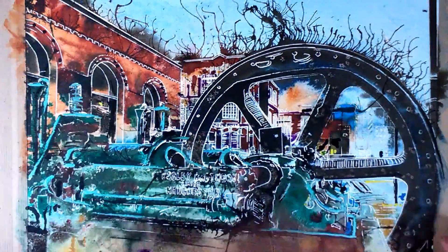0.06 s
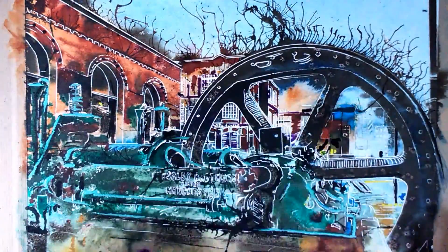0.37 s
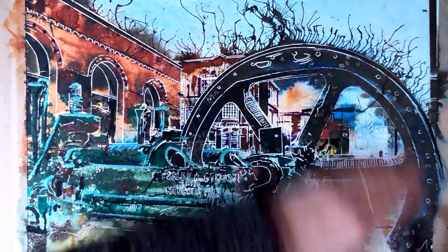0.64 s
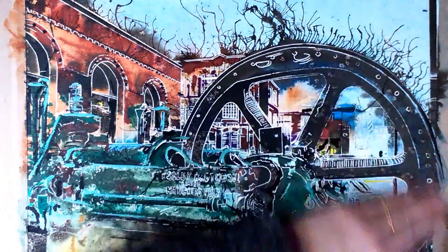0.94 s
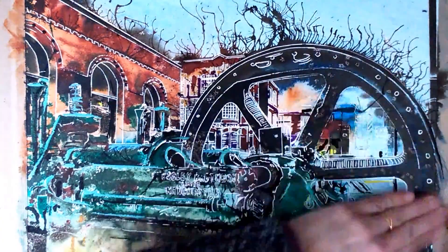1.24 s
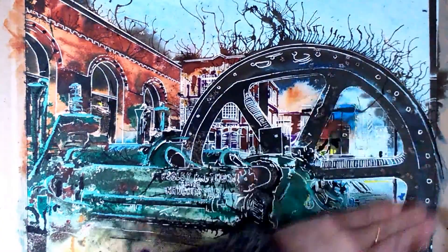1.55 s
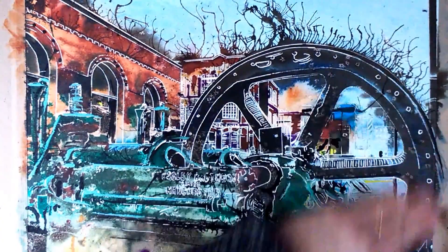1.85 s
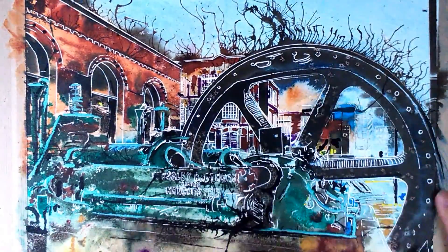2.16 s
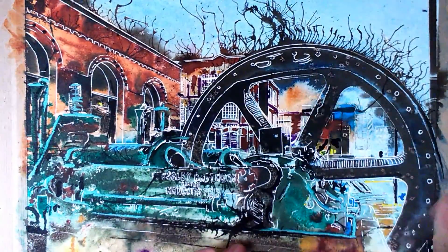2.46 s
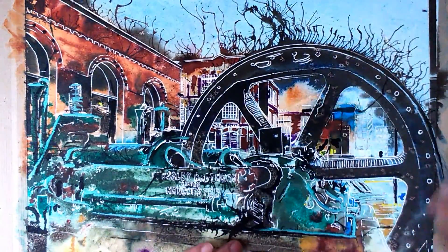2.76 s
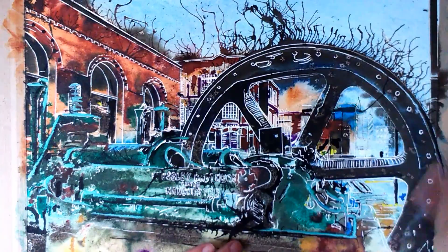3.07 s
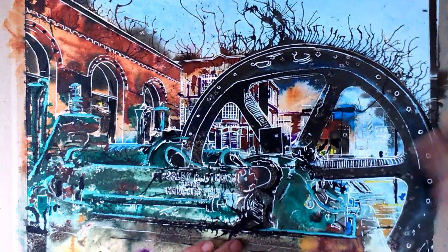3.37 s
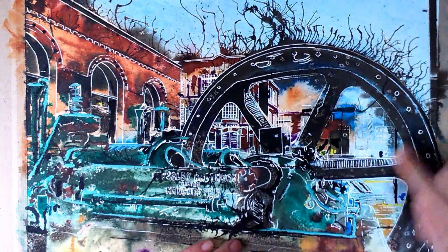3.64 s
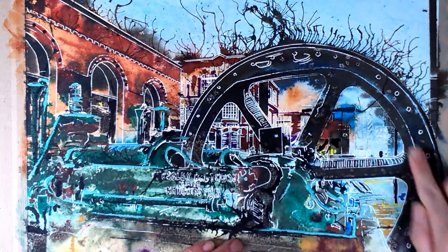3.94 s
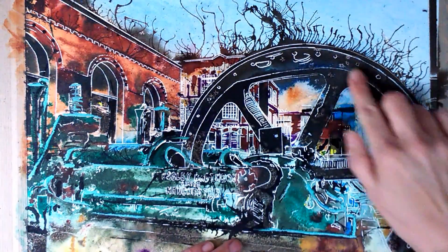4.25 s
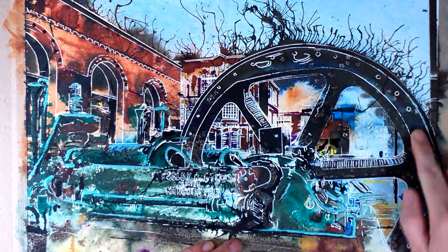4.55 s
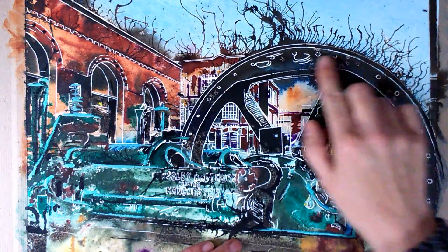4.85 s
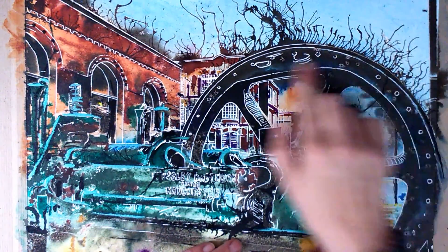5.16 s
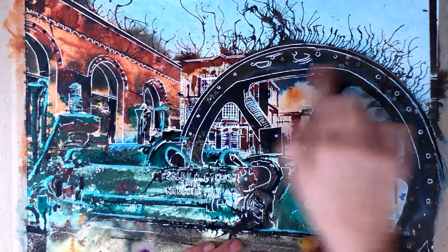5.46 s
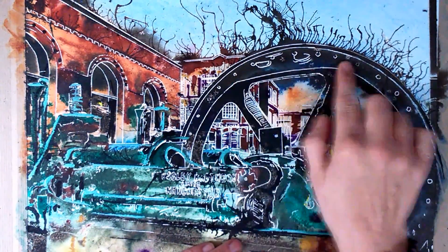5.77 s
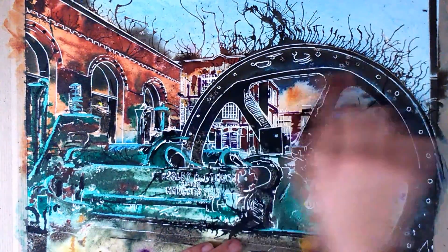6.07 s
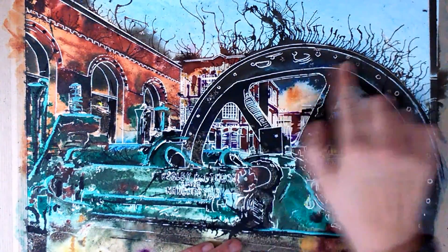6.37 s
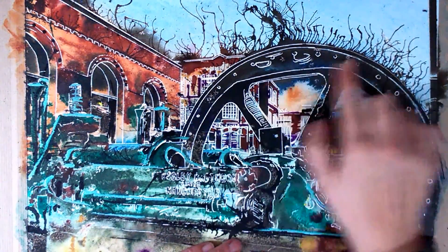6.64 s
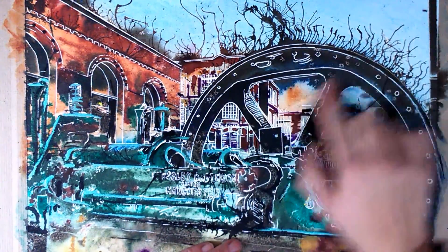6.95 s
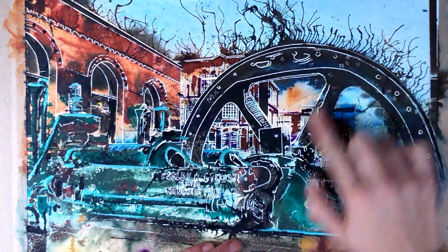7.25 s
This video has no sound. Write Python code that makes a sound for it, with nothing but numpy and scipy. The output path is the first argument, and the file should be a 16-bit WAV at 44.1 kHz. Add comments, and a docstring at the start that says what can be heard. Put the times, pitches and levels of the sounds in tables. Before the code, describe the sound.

A hand rubs paper in quick strokes, bright hissing palm sweeps first, then softer fingertip scrubbing, in a quiet room.

```python
"""A small quiet studio, the microphone just above a watercolour taped to a board.
A hand rubs dried masking fluid off the sheet. The flat palm lands and sweeps in long bright strokes;
then fingertips scrub to and fro, softer and duller. Each stroke is an arch of speed.
Skin snags on the tooth of the paper and now and then squeaks; a landing hand, a nail or a crumb ticks.
The board murmurs and thuds, and the room hums faintly behind it all."""
import sys
import numpy as np
from scipy import signal
from scipy.fft import rfft, irfft
from scipy.io import wavfile

SR = 44100
rng = np.random.default_rng(int(sys.argv[2]) if len(sys.argv) > 2 else 0)


def materialize(psi):
    """Save the field psi as 16-bit PCM at rate SR to the path in sys.argv[1].

    A 1-D psi becomes a single channel; in a 2-D psi each row is a channel.
    """
    bounded = np.clip(np.atleast_2d(psi).T, -1, 1)
    quanta = np.round(bounded * 32767).astype(np.int16)
    wavfile.write(sys.argv[1], SR, quanta)


N = 326781


def from_db(db):
    """Decibels to gain."""
    return 10 ** (np.asarray(db) / 20)


def rms_one(x):
    """Scale to unit power."""
    return x / np.sqrt(np.mean(x ** 2) + 1e-20)


def at_hz(points, hz):
    """Read a spectrum on a log-frequency axis."""
    knots, level_db = np.transpose(points)
    return np.interp(np.log(hz), np.log(knots), level_db)


def at_time(points, s):
    """Read a curve at these times."""
    return np.interp(s, *np.transpose(points))


def bins(size):
    """Frequencies of the spectrum of a signal of this length."""
    return np.maximum(np.fft.rfftfreq(size, 1 / SR), 1)


def times(length, block=4096):
    """Time axis in whole blocks, long enough for a short sound."""
    return np.arange((int(length * SR) // block + 1) * block) / SR


def add(out, sound, s):
    """Mix a sound in at its time."""
    at = round(s * SR)
    out[at:at + len(sound)] += sound[:N - at]


def colour(x, gain_db):
    """Give a steady excitation a spectrum; rms 1."""
    return rms_one(irfft(rfft(x) * from_db(gain_db), len(x)))


def drift(rate_hz, size):
    """Smooth random wandering of spread 1."""
    return colour(rng.standard_normal(size), -20 * np.log10(1 + (bins(size) / rate_hz) ** 2))


def band(centre_hz, width_hz, size):
    """An unsteady vibration round a pitch that may glide; rms about 1."""
    phase = 2 * np.pi * np.cumsum(centre_hz * np.ones(size)) / SR
    return drift(0.61 * width_hz, size) * np.cos(phase) + drift(0.74 * width_hz, size) * np.sin(phase)


def resonance_db(hz, centre_hz, width_hz):
    """Response of one resonance, 0 dB on top."""
    return -10 * np.log10(1 + ((hz ** 2 - centre_hz ** 2) / (hz * width_hz)) ** 2)


def ring(force, hz, t60):
    """A unit click sets a sine of height 1 ringing."""
    r, w = from_db(-60 / (t60 * SR)), 2 * np.pi * hz / SR
    return signal.lfilter([0, np.sin(w)], [1, -2 * r * np.cos(w), r * r], force + 1e-18)


def studio(x, table_s=0.0014, table_db=-14, tail_db=-7.5, t60_s=0.49, treble_t60_s=0.22, size=16384):
    """At the microphone: direct sound, a close bounce off the table, a tail whose top dies first."""
    t, white = np.arange(size) / SR, rng.standard_normal(size)
    low = signal.sosfiltfilt(signal.butter(2, 10000, fs=SR, output="sos"), white)
    tail = low * from_db(-60 * t / t60_s) + (white - low) * from_db(-60 * t / treble_t60_s)
    tail *= np.clip(t / 0.0074, 0, 1)
    paths = from_db(tail_db) * tail / np.linalg.norm(tail)
    paths[0] += 1
    paths[round(table_s * SR * rng.uniform(.6, 1.4))] += from_db(table_db)
    return signal.fftconvolve(x, paths)


# Still air all round the microphone. Each row: frequency in Hz, relative level in dB.
AIR_SPECTRUM = [(20, -8), (40, 0.5), (62, 6.5), (85, 4), (140, -3), (200, -9), (320, -10), (500, -10.5),
                (1000, -18), (2000, -23.5), (4000, -24), (9000, -25.5), (15500, -26)]
# The studio's hum, far in the background. Each row: pitch in Hz, resonance width in Hz, level in dB.
HUM_LINES = [(61.4, 14, -58.5), (134, 25, -68.5), (250.1, 11, -67.5), (319.5, 13, -82.5),
             (368.4, 7.2, -75.5), (1005, 9.4, -74)]


def room_tone(air_db=-56.5):
    """Steady air noise with a few wavering hum lines."""
    hz = bins(N)
    air = from_db(air_db) * colour(rng.standard_normal(N), at_hz(AIR_SPECTRUM, hz))
    hum = np.zeros(N)
    for centre, width, level_db in HUM_LINES:
        hum += from_db(level_db) * colour(rng.standard_normal(N), 2 * resonance_db(hz, centre, width))
    return air + hum


# The hand knocks the board below the microphone.
# Each row: start in seconds, strength of the push in dB, contact time in seconds.
BOARD_KNOCKS = [(0.004, -39.5, 0.0036), (0.286, -32, 0.0033), (0.298, -39, 0.0079), (0.333, -45, 0.0014),
                (0.953, -44, 0.0094), (1.359, -40, 0.011), (4.857, -47, 0.009), (5.815, -52.5, 0.0022),
                (6.385, -42.5, 0.013), (7.36, -53, 0.012)]
# The board's low modes. Each row: frequency in Hz, gain in dB, time to fall 60 dB in seconds.
BOARD_RESONANCES = [(70, 0.5, 0.27), (143.6, 6, 0.18), (178, -9, 0.091), (324, 1, 0.33), (355, -5, 0.31)]


def board_bumps():
    """Soft flesh pushes the board, whose low modes ring briefly."""
    t, force = np.arange(N) / SR, np.zeros(N)
    for s, level_db, contact_s in BOARD_KNOCKS:
        push = np.exp(-np.pi * (2 * (t - s - contact_s / 2) / contact_s) ** 2)
        force += from_db(level_db) * push / push.sum()
    return sum(from_db(gain_db) * ring(force, hz, t60) for hz, gain_db, t60 in BOARD_RESONANCES)


# A fingertip or nail grips the sheet, close up.
# Each row: start in seconds, length in seconds, pitch in Hz, width in Hz, level in dB.
FINGER_SQUEAKS = [(0.539, 0.033, 5460, 1110, -36.5), (1.963, 0.022, 1850, 90, -50),
                  (2.267, 0.13, 1345, 200, -58.5), (2.342, 0.049, 2750, 400, -57),
                  (2.657, 0.033, 4700, 150, -57), (4.899, 0.061, 2390, 90, -61),
                  (5.06, 0.042, 2324, 40, -57)]


def squeaks():
    """Stick and slip of a fingertip: a narrow, rough tone that swells and dies."""
    out = np.zeros(N)
    for s, length, hz, width_hz, level_db in FINGER_SQUEAKS:
        along = np.clip(times(length) / length, 0, 1)
        swell = np.sqrt(4 * along * (1 - along))
        tone = band(hz, width_hz, len(along))
        add(out, studio(from_db(level_db) * swell * tone), s)
    return out


# Sharp contacts right under the microphone. Each row: start in seconds, direct sound's peak in dB.
CONTACT_TICKS = [(0.283, -41), (0.540, -39), (1.7605, -36), (2.463, -41), (2.767, -48), (3.252, -39),
                 (3.708, -40), (5.198, -37), (5.464, -35.5), (6.262, -30), (7.083, -37), (7.176, -47)]


def ticks(decay_s=0.0096, size=1024):
    """Short bright cracks as the hand lands, or a nail or crumb catches."""
    out = np.zeros(N)
    decay = np.exp(-np.arange(size) / SR / decay_s)
    for s, peak_db in CONTACT_TICKS:
        tick = colour(rng.standard_normal(size), at_hz(HISS_SPECTRUM, bins(size))) * decay
        add(out, studio(from_db(peak_db) * tick / np.abs(tick).max()), s)
    return out


def snags(per_s, spread_db, size):
    """Skin catches on paper fibres and lets go: dense tiny clicks of uneven size."""
    sizes = from_db(spread_db * np.minimum(rng.exponential(1, size), 5))
    return sizes * rng.choice([-1, 1], size) * (rng.random(size) < per_s / SR)


# The board, heard through the sheet. Each row: frequency in Hz, relative level in dB.
MURMUR_SPECTRUM = [(25, -20), (45, -5), (70, 4), (170, 1.5), (380, 2.5), (490, -4.5), (620, -2.5),
                   (900, -5), (1500, -7), (4000, -17.5)]
# The hand's weight, high when the palm slaps down or drags. Each row: time in seconds, gain in dB.
WEIGHT_ON_BOARD = [(0.35, 6), (0.6, -5.5), (1.4, 2.5), (2.15, 2.5), (2.9, -2), (3.5, -3.5), (4.15, 5),
                   (4.9, 7), (5.45, 2), (5.95, 3), (7.2, -2)]


def board_murmur(middle_s, size, level_db=-7):
    """Friction shakes the board, more loudly under a heavy hand."""
    grains = snags(per_s=2500, spread_db=3.25, size=size)
    murmur = colour(grains, at_hz(MURMUR_SPECTRUM, bins(size)))
    return murmur * from_db(level_db + at_time(WEIGHT_ON_BOARD, middle_s))


def finger_roll(x, patchy_db=3.0, rate_hz=22, count=12):
    """Fingers roll over the sheet, so each part of the spectrum swells and fades on its own; rms 1."""
    place = np.interp(np.log(bins(len(x))), np.log([700, 6000]), [0, count - 1])
    spectrum = rfft(x)
    parts = (irfft(spectrum * np.maximum(1 - np.abs(place - k), 0), len(x)) for k in range(count))
    return rms_one(sum(part * from_db(patchy_db * drift(rate_hz, len(x))) for part in parts))


# Finger pads on paper, at close range. Each row: frequency in Hz at the usual pitch, relative dB.
RUB_SPECTRUM = [(400, -10), (900, -15), (1400, -3), (2600, -2.5), (4000, -6.5), (6500, -17.5), (15000, -61)]
# The pads' rasp, low in slow drags. Each row: time in seconds, pitch in Hz.
RASP_GLIDE = [(0.3, 1720), (0.6, 2905), (1.1, 2295), (1.95, 1853), (2.3, 1498), (3.1, 1405), (3.65, 1607),
              (4.0, 1197), (4.25, 1444), (4.55, 1713), (4.72, 700), (4.84, 849), (4.92, 2402), (6.4, 2450),
              (6.65, 1755), (7.05, 2780), (7.4, 2375)]


def finger_rub(clock_s, middle_s, slowness, usual_hz=2080, rasp_width_hz=740):
    """Soft pads slip in coarse steps and chatter round one pitch; rms 1."""
    size = len(clock_s)
    rasp_db = -6.5 + 8 * slowness   # against the rub: slow drags rasp more
    rasp = from_db(rasp_db) * band(at_time(RASP_GLIDE, clock_s), rasp_width_hz, size)
    shift = (at_time(RASP_GLIDE, middle_s) / usual_hz) ** 0.33   # the rub partly follows that pitch
    grains = snags(per_s=4500, spread_db=2.13, size=size)
    rub = colour(grains, at_hz(RUB_SPECTRUM, bins(size) / shift))
    return rms_one(finger_roll(rub) + rasp)


# The paper's tooth, bright from just above. Each row: frequency in Hz, relative level in dB.
HISS_SPECTRUM = [(500, -54), (1500, -24), (3000, -12), (4200, -8), (6000, -3), (8600, -0.5), (10500, -3),
                 (12500, -7.5), (15500, -11.5)]
# The hiss brightens and dulls. Each row: time in seconds, tilt above 4 kHz in dB per octave.
HISS_TILT = [(0.1, 0), (1.15, 1.9), (1.35, 3), (1.8, 2.5), (2.1, -.5), (2.85, 0.5), (3.5, 2), (4.1, -1.5),
             (4.8, 0.5), (6.7, 1.5), (7.35, 1)]


def paper_hiss(level_db, middle_s, size):
    """Skin brushes the paper; a loud palm touches so many fibres that it is smoother than a fingertip."""
    per_s = np.interp(level_db, [-50, -25], [15000, 40000])
    spread_db = np.interp(level_db, [-40, -22], [2.5, 1.0])
    hz = bins(size)
    tilt_db = at_time(HISS_TILT, middle_s) * np.log2(np.maximum(hz, 4000) / 8000)
    return from_db(level_db) * colour(snags(per_s, spread_db, size), at_hz(HISS_SPECTRUM, hz) + tilt_db)


def speed_arch(along, top, fall_power=0.96):
    """Speed of the hand, 0-1: an early top is a landing, a late one a push that gathers pace."""
    top = np.clip(top, .02, .95)
    rise = np.sin(np.pi / 2 * np.minimum(along / top, 1))
    fall = np.sin(np.pi / 2 * np.minimum((1 - along) / (1 - top), 1))
    rise_power = 0.64 * (2 * top) ** 0.58   # the earlier the top, the more abrupt the touch-down
    return rise ** rise_power * fall ** fall_power


def stroke(start, end, top, hiss_db, rub_db, usual_s=0.16, swell_db=1.0):
    """One pass of the hand: hiss follows its speed fully, the rub and the board's murmur less so."""
    length, middle_s = end - start, (start + end) / 2
    along = np.clip(times(length) / length, 0, 1)
    size = len(along)
    speed = speed_arch(along, top) ** ((usual_s / length) ** 0.24)   # a long stroke holds its speed
    press_db = rub_db + swell_db * (along - .5)   # the pads press harder towards the end
    judder = drift(rate_hz=53, size=size)   # the skin grips and slips unevenly
    hiss = paper_hiss(hiss_db, middle_s, size)
    hiss *= speed * from_db(-0.35 + 1.26 * judder)
    rub = finger_rub(start + along * length, middle_s, slowness=np.log2(length / usual_s))
    rub *= speed ** 0.82 * from_db(press_db - 0.5 - 0.54 * judder)
    murmur = board_murmur(middle_s, size) * speed ** 0.59 * from_db(press_db)
    return hiss + rub + murmur


# The hand crossing the sheet just below the microphone. Each row: start in seconds, end in seconds,
# place of top speed as a share of the stroke, relative hiss level in dB, relative rub level in dB.
HAND_STROKES = [(0.0, 0.069, 0, -22, -42.5), (0.029, 0.146, 0, -42.5, -54), (0.159, 0.302, 0.85, -59, -67),
                (0.279, 0.423, 0.51, -26.5, -41.5), (0.539, 0.643, 0.28, -32, -49.5),
                (0.638, 0.8, 0.68, -37.5, -45), (0.813, 0.927, 0.61, -33, -47.5),
                (0.936, 1.075, 0.56, -36.5, -48), (1.092, 1.201, 0.67, -34.5, -48),
                (1.218, 1.356, 0.5, -39, -49), (1.368, 1.483, 0.67, -35.5, -49.5),
                (1.499, 1.679, 0.43, -39.5, -53), (1.702, 1.846, 0.37, -39, -55),
                (1.847, 1.988, 0.4, -41.5, -55), (1.945, 2.035, 0.5, -38.5, -51),
                (2.015, 2.18, 0.25, -49, -55.5), (2.119, 2.27, 0.54, -50, -64),
                (2.27, 2.406, 0.58, -49, -56), (2.458, 2.574, 0.18, -46.5, -54),
                (2.596, 2.71, 0.59, -49, -58), (2.767, 2.923, 0.2, -50.5, -54),
                (2.935, 3.056, 0.63, -47.5, -56), (3.091, 3.22, 0.3, -47, -51.5),
                (3.241, 3.334, 0.17, -45.5, -55), (3.357, 3.455, 0.23, -47.5, -52),
                (3.462, 3.561, 0.33, -48.5, -52.5), (3.585, 3.667, 0.3, -52, -50.5),
                (3.702, 3.807, 0.2, -51.5, -54), (3.769, 3.92, 0.43, -58, -63.5),
                (3.934, 4.29, 0.6, -56, -57.5), (4.196, 4.404, 0.58, -56, -61.5),
                (4.46, 4.664, 0.24, -51, -59), (4.695, 4.894, 0.46, -54.5, -58.5),
                (4.819, 5.007, 0.47, -54, -58), (5.02, 5.14, 0.58, -50.5, -61.5),
                (5.17, 5.343, 0.44, -49, -56), (5.37, 5.492, 0.78, -48.5, -54.5),
                (5.528, 5.694, 0.32, -48.5, -55), (5.709, 5.856, 0.47, -48, -55.5),
                (5.871, 6.051, 0.35, -47.5, -55), (6.067, 6.213, 0.5, -44, -52),
                (6.234, 6.347, 0.2, -45, -52), (6.37, 6.474, 0.15, -48, -57),
                (6.486, 6.602, 0.37, -48, -56.5), (6.628, 6.734, 0.3, -50, -52.5),
                (6.755, 6.872, 0.3, -48, -57), (6.892, 7.01, 0.32, -50, -56),
                (7.008, 7.117, 0.75, -48, -51), (7.17, 7.281, 0.12, -53, -53.5),
                (7.292, 7.41, 0.3, -49, -51.5)]


def rubbing():
    """All strokes, each reaching the microphone by paths of its own as the hand moves."""
    out = np.zeros(N)
    for start, end, top, hiss_db, rub_db in HAND_STROKES:
        add(out, studio(stroke(start, end, top, hiss_db, rub_db)), start)
    return out


def scene():
    """The hand on the sheet, heard from just above, alike in both channels."""
    mono = rubbing() + squeaks() + ticks() + board_bumps() + room_tone()
    return np.array([mono, mono])


def record(dry, low_cut_hz=30, high_cut_hz=15750):
    """The microphone sheds the deepest bass; the top is cut steeply."""
    thinned = signal.sosfilt(signal.butter(2, low_cut_hz, "high", fs=SR, output="sos"), dry)
    return signal.sosfilt(signal.ellip(12, .1, 80, high_cut_hz, fs=SR, output="sos"), thinned)


dry = scene()
out = record(dry)
materialize(out)
```